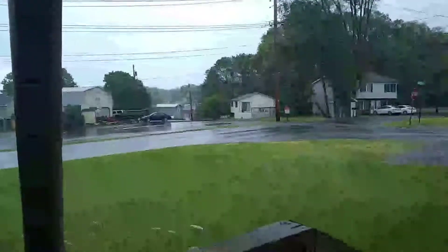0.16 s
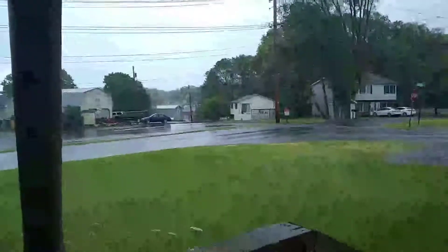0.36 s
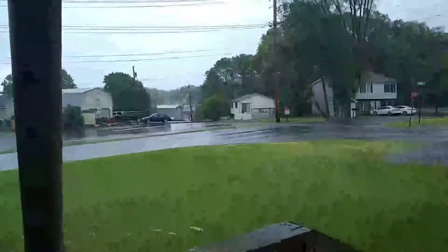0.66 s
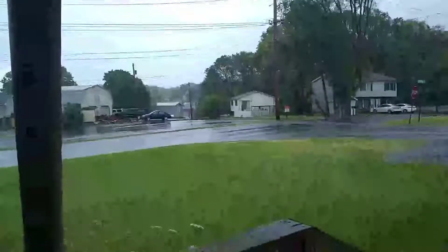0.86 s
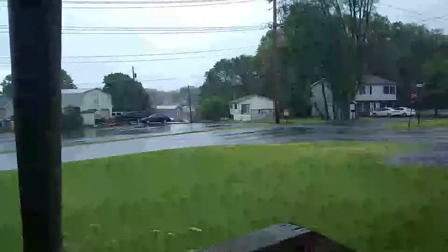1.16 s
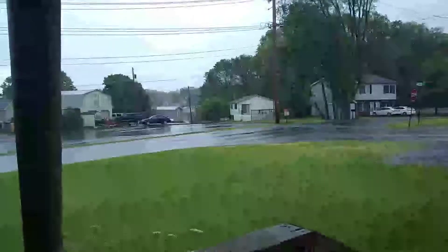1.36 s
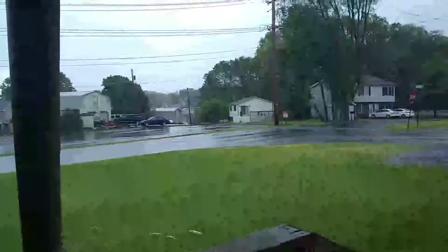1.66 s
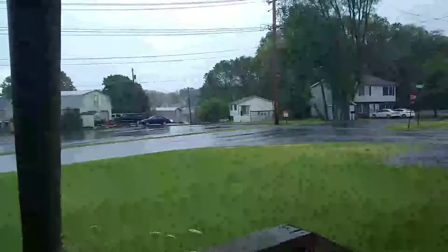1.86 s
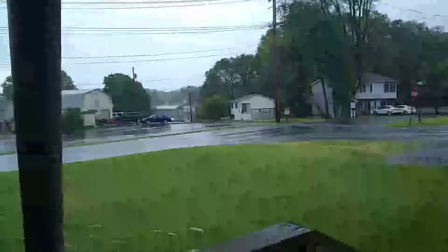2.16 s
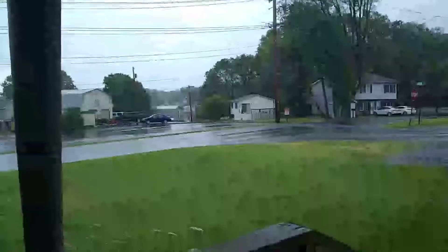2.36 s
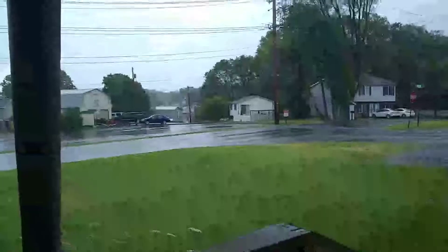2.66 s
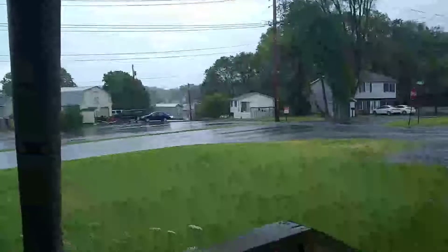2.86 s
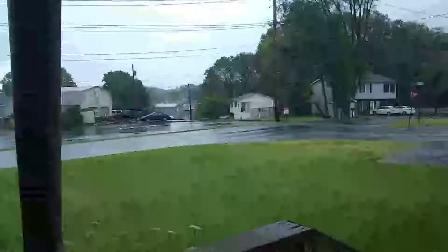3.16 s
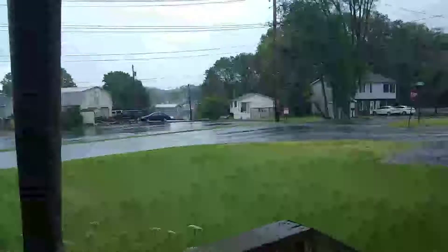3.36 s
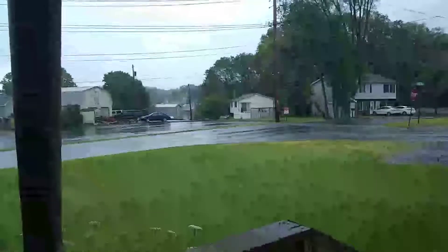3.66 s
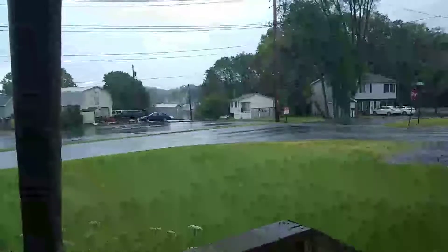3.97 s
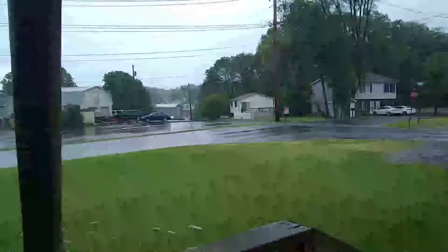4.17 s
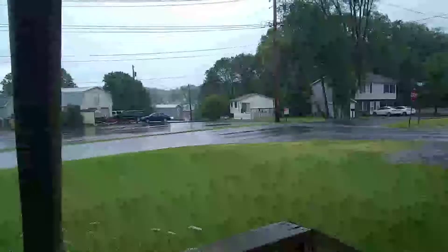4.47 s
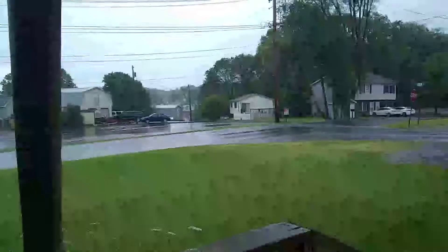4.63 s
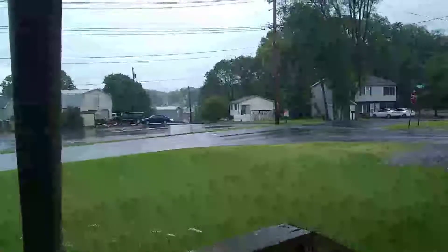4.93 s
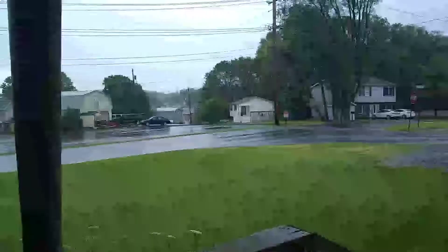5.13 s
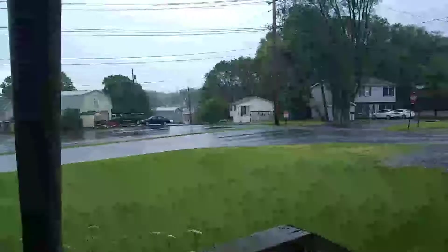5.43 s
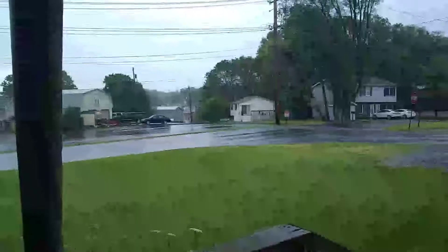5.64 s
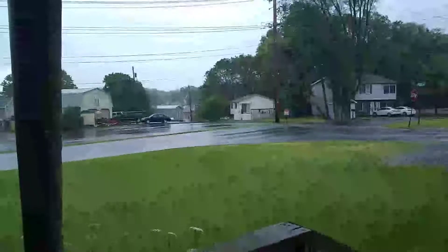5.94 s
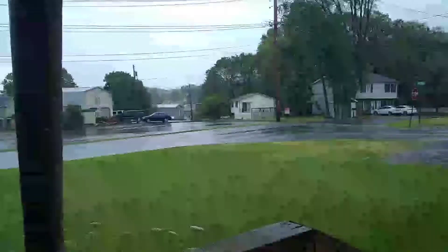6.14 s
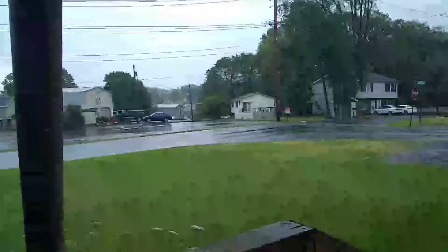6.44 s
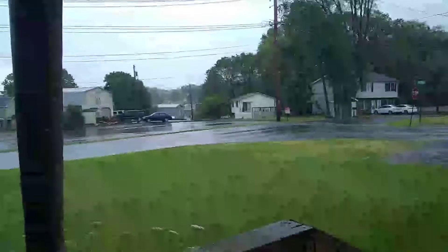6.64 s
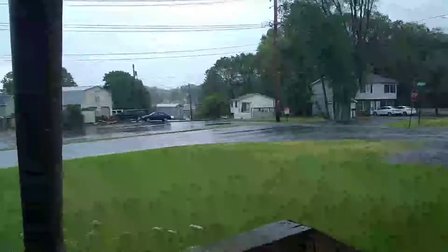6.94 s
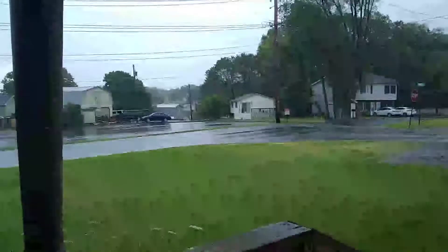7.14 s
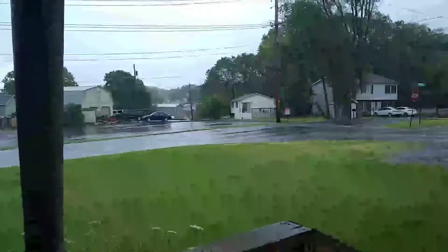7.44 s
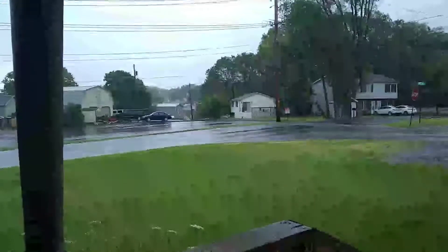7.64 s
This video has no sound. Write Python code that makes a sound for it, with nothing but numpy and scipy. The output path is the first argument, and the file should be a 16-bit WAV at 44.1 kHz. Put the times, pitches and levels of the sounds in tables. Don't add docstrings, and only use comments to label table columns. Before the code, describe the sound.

Dense downpour heard from a porch, a broad steady wash with faint low hum, nearby drop splashes, and short whistled bird calls scattered throughout.

```python
import sys
import numpy as np
from scipy import signal
from scipy.fft import rfft, irfft
from scipy.io import wavfile
from scipy.ndimage import uniform_filter1d

SR = 44100
rng = np.random.default_rng(int(sys.argv[2]) if len(sys.argv) > 2 else 0)


def int16_out(signal):
    q = np.round(np.clip(np.atleast_2d(signal).T, -1, 1) * 32767)
    wavfile.write(sys.argv[1], SR, q.astype(np.int16))


def invert_db(x):
    u = np.asarray(x, float) / 20
    return 10 ** u


N = 343980
HZ = np.maximum(np.fft.rfftfreq(N, 1 / SR), 1)


def rms_one(x):
    return x / np.sqrt(np.mean(x ** 2) + 1e-20)


def by_hz(rows):
    hz, *columns = np.transpose(rows)
    return [np.interp(np.log(HZ), np.log(hz), c) for c in columns]


def in_time(rows):
    s, *columns = np.transpose(rows)
    return [np.interp(np.arange(N) / SR, s, c) for c in columns]


def drift(rate_hz, count=1):
    r = np.exp(-2 * np.pi * rate_hz * 40 / SR)
    noise = rng.standard_normal((count, N // 40 + 2002))
    slow = signal.lfilter([1], [1, -2 * r, r * r], noise)[:, 2000:]
    return np.array([np.interp(np.arange(N) / 40, np.arange(len(s)), rms_one(s)) for s in slow])


def band(x, low_hz, high_hz):
    return signal.sosfilt(signal.butter(2, [low_hz, high_hz], "band", fs=SR, output="sos"), x)


# (frequency [Hz], share from the left [0-1], diffuse share [0-1], extra port phase [rad])
ARRIVAL = [(30, 0.6, 0.3, -1), (60, 0.16, 0.13, 0.099), (130, 0.16, 0.58, 1.1), (282, 0.19, 0.34, 1.57),
           (490, 0.1, 0.17, 0.81), (850, .4, .05, .2), (1135, .4, .007, 0), (2240, .45, .005, .09),
           (3430, .6, .09, -.06), (4550, .8, .21, 0), (5650, .8, .4, .09), (8200, 0.6, 0.63, -0.84),
           (10000, .5, 1, -0.46), (14000, 0.4, 1, 0.9)]
PORT_LAG_S = 4.4e-4


def ports(left_side, right_side=0, diffuse=(0, 0)):
    late = np.exp(-1j * (2 * np.pi * HZ * PORT_LAG_S + by_hz(ARRIVAL)[2]))
    left_port = left_side + late * right_side + diffuse[0]
    right_port = -late * left_side - right_side + diffuse[1]
    return np.array([left_port, right_port])


def spread(four):
    left, loose = (np.clip(c, 0, 1) for c in by_hz(ARRIVAL)[:2])
    a, b, c, d = four
    from_left = a * np.sqrt(left * (1 - loose))
    from_right = b * np.sqrt((1 - left) * (1 - loose))
    return ports(from_left, from_right, np.sqrt(loose) * np.array([c, d]))


# (frequency [Hz], density [dB per Hz])
RAIN = [(25, -19), (60, 0.5), (120, -1.5), (240, 0), (450, -1.5), (650, -6.5), (1400, -8.5), (3000, -9),
        (5000, -9), (6650, -11.5), (6900, -10), (8000, -15.5), (10000, -23.5), (14000, -28.5)]
# (time [s], level [dB])
STRENGTH = [(0, 1.1), (1.7, 0), (2.5, 0.8), (2.9, -0.7), (3.5, 0.6), (4.5, 0.1), (4.8, -0.5), (5.3, -0.1),
            (6.5, -1.7), (6.9, -1), (7.8, -1.5)]
HISS_DB, WASH_DB, WASH_FOLLOWS = -0.42, -1.0, 0.26
TRAFFIC_DB, TRAFFIC_RISE_DB_PER_S = -6.0, .5


def rain(drops_per_s=1100.0, size_db=2.5, gust_db=0.22, patch_db=0.86, drop_share=.07):
    strength_db, = in_time(STRENGTH)
    traffic_db = TRAFFIC_DB + TRAFFIC_RISE_DB_PER_S * np.arange(N) / SR
    levels_db = np.array([traffic_db, WASH_DB + WASH_FOLLOWS * strength_db, HISS_DB + strength_db])
    sizes_db = size_db * np.minimum(rng.exponential(1, N), 5)
    hit = (rng.random(N) < drops_per_s / SR) * invert_db(sizes_db)
    burst = rms_one(np.sqrt(signal.lfilter([1], [1, -.985], hit ** 2)))
    white = rng.standard_normal((2, 4, N))
    centres = np.array([80, 400, 1200, 2000, 3200, 4800, 7000, 9500, 12500])
    place = np.interp(np.log(HZ), np.log(centres), np.arange(len(centres)))
    gust, patches, out = drift(11.0)[0], drift(14.4, count=len(centres) + 1), 0
    for k, hz in enumerate(centres):
        shares = [np.interp(np.log(hz), np.log([80, 700, 10000]), row) for row in np.eye(3)]
        near = np.clip(np.log2(hz / 480.0) / 2, 0, 1)
        swell_db = near * (gust_db * gust + patch_db * (patches[k] + .5 * patches[k + 1]))
        grain = np.sqrt(1 + near * drop_share * (burst ** 2 - 1))
        window = np.cos(np.pi / 2 * np.clip(place - k, -1, 1))
        out = out + window * rfft(invert_db(shares @ levels_db + swell_db) * grain * white[k % 2])
    return spread(out) * invert_db(by_hz(RAIN)[0] - 33.0)


# (frequency [Hz], rms level [dB])
HUM = [(120, -69), (240, -64.5), (480, -69.5), (720.5, -76)]
# (time [s], level [dB])
LOAD = [(0, -69), (2.5, -76), (2.76, -59), (3.2, -67), (3.9, -70), (4.26, -53.5), (4.5, -71), (4.74, -58.5),
        (5.2, -60.5), (6.7, -60), (7.8, -71)]
THIRD_HZ = 179.8


def hum(waver_db=5.0, third_db=3.0):
    t, waver = np.arange(N) / SR, drift(4.7, count=len(HUM))
    tones = invert_db(in_time(LOAD)[0] + third_db) * np.sin(2 * np.pi * THIRD_HZ * t)
    for (hz, db), w in zip(HUM, waver):
        tones += invert_db(db + 2.0 + waver_db * w) * np.sin(2 * np.pi * (hz * t + rng.random()))
    return ports(0, rfft(tones))


# (time [s], rms level [dB], low edge [Hz], high edge [Hz], t60 [s])
SPLASHES = [(.31, -60, 4500, 9000, .1), (.67, -46, 3000, 6500, 0.072), (2.143, -38, 2580, 4330, 0.2),
            (2.17, -55, 2000, 4500, .14), (2.15, -53, 5000, 10000, 0.23), (2.145, -46, 900, 1800, 0.091),
            (2.6, -45.5, 1200, 3200, 0.1), (3.43, -57, 6000, 12000, .1), (3.491, -46, 2500, 8700, 0.063),
            (4.885, -43.5, 1000, 2900, .25), (5.335, -51, 1500, 4000, 0.17),
            (5.615, -46.5, 2000, 6300, 0.25), (6.066, -56, 7000, 12000, .08)]
NEARBY_ECHO_DB = -12.5


def splashes(spatter_db=1.0, rise_s=0.0025):
    out, t = np.zeros((4, N)), np.arange(SR // 4) / SR
    ragged = invert_db(spatter_db * drift(110.0)[0])
    for s, db, low_hz, high_hz, t60 in SPLASHES:
        at = slice(round(s * SR), round(s * SR) + len(t))
        puff = rms_one(band(rng.standard_normal((4, len(t))), low_hz, high_hz))
        out[:, at] += invert_db(db - 60 * t / t60) * np.minimum(t / rise_s, 1) * ragged[at] * puff
    spectra = rfft(out)
    return spread(spectra) + invert_db(NEARBY_ECHO_DB) * spectra[2:]


WHISTLE_RASP_HZ, WARBLE_RASP_HZ, CHIP_RASP_HZ = 35.0, 100, 55

# (time [s],
# length [s], first pitch [Hz], last pitch [Hz], rms level [dB])
CHIPS = [(0.329, 0.075, 3390, 3010, -55), (0.523, .035, 3300, 3130, -59), (4.12, 0.0214, 5520, 4820, -50),
         (1.859, 0.02, 3760, 4270, -57), (2.207, 0.058, 2870, 2820, -51), (2.2, 0.04, 3650, 3530, -59),
         (2.884, 0.033, 4050, 3990, -58), (4.185, 0.023, 3720, 3670, -50.5), (4.33, 0.028, 3370, 4700, -50),
         (4.358, .019, 3950, 3600, -45), (4.375, .02, 3520, 3500, -49), (4.388, .032, 3820, 3800, -52),
         (4.4, 0.013, 3470, 3160, -50), (6.873, 0.049, 3300, 3110, -60)]


def chips():
    return [(s, length, [first, last], db, CHIP_RASP_HZ) for s, length, first, last, db in CHIPS]


# (time [s], length [s], pitch [Hz], rms level [dB], rms level of the rise into it [dB])
WHISTLES = [
    (1.691, 0.042, 6520, -54, -66),
    (3.986, .032, 6680, -49, -66),
    (5.074, 0.031, 6720, -49, -48),
    (7.281, 0.053, 6730, -49, -48),
]
LEAD_S, LEAD_HZ = 0.021, -850
DROP_S, DROP_HZ, DROP_DB = 0.023, -520, 2
RING_S, RING_DB = .045, -7.0
UPPER_HZ, UPPER_DB, UPPER_S = 877, -11.5, 0.065


def whistles():
    out = []
    for s, length, hz, db, lead_db in WHISTLES:
        end = s + length
        out += [(s - LEAD_S, LEAD_S, [hz + LEAD_HZ, hz], lead_db, WHISTLE_RASP_HZ),
                (s, length, [hz, hz], db, WHISTLE_RASP_HZ),
                (end, DROP_S, [hz, hz + DROP_HZ, hz + DROP_HZ], db + DROP_DB, WARBLE_RASP_HZ),
                (end, RING_S, [hz, hz], db + RING_DB, WHISTLE_RASP_HZ),
                (s, UPPER_S, [hz + UPPER_HZ, hz + UPPER_HZ], db + UPPER_DB, WHISTLE_RASP_HZ)]
    return out


# (time [s], length [s], pitch [Hz], rms level [dB], rasp width [Hz])
LOWER = [(1.725, .06, 5400, -54.5, 160), (1.92, .035, 5370, -53.5, 200), (1.955, 0.034, 5040, -48.5, 200),
         (4.016, .1, 5470, -48.5, 73), (4.14, .05, 5120, -50.5, 140), (4.135, .07, 5800, -52, 250),
         (1.875, 0.043, 6200, -59, 130), (4.191, 0.19, 5600, -58, 400), (5.119, 0.049, 5180, -53.5, 200),
         (5.285, 0.042, 5760, -51, 300), (5.292, 0.053, 5150, -51, 250), (6.777, .053, 4920, -56, 300),
         (7.339, 0.13, 5420, -53.5, 130), (7.43, .015, 4730, -53, 30), (7.448, 0.068, 5500, -56.5, 140),
         (7.483, 0.16, 5890, -57.5, 600)]
SAG_HZ_PER_S = 1100


def lower_voice():
    return [(s, length, [hz, hz - SAG_HZ_PER_S * length], db, rasp_hz) for s, length, hz, db, rasp_hz in LOWER]


# (time [s], length [s], rms level [dB])
ARCHES = [
    (1.915, .04, -57),
    (4.042, .047, -50),
    (4.093, 0.047, -47.5),
    (5.252, .047, -47),
    (5.313, 0.036, -51),
    (7.359, 0.046, -45),
    (7.411, 0.057, -50),
    (7.575, 0.043, -60),
]
ARCH_HZ = [5600, 6300, 6590, 6500, 6050]


def arches():
    return [(s, length, ARCH_HZ, db, WARBLE_RASP_HZ) for s, length, db in ARCHES]


def birds(hoarse_per_hz=0.0042, rough_db=2.5, edge_s=0.0051, echo_t60=0.51, echo_db=-7):
    out, flutter, breath = np.zeros(N), drift(69.0)[0], rng.standard_normal((2, N))
    for start, length, path_hz, db, rasp_hz in chips() + whistles() + lower_voice() + arches():
        at = np.arange(round(start * SR), round((start + length) * SR))
        t = at / SR - start
        pitch_hz = np.interp(t, np.linspace(0, length, len(path_hz)), path_hz)
        turn = np.exp(2j * np.pi * np.cumsum(pitch_hz) / SR)
        low_pass = signal.butter(2, max(rasp_hz, 5) * 2, fs=SR)
        rasp = signal.lfilter(*low_pass, breath[:, at - round(path_hz[0])])
        hoarse = np.clip(hoarse_per_hz * rasp_hz, 0, 1)
        voice = np.sqrt(1 - hoarse) + np.sqrt(2 * hoarse) * np.array([1, 1j]) @ rms_one(rasp) / 2
        shape = np.clip(np.minimum(t, t[-1] - t) / edge_s, 0, 1)
        out[at] += invert_db(db + 5.5 + rough_db * flutter[at]) * shape * (voice * turn).imag
    t = np.arange(SR // 2) / SR
    tails = rng.standard_normal((2, len(t))) * invert_db(-60 * t / echo_t60) * (t > .006)
    echoes = invert_db(echo_db) * rfft(tails / np.sqrt(np.sum(tails[0] ** 2)), N)
    return ports(rfft(out)) + echoes * rfft(out)


# (frequency [Hz], left minus right [dB])
LEAN = [(60, -4.5), (110, 0), (200, 2.5), (370, 1.5), (690, 0), (1270, 1), (2330, -1), (4290, 0),
        (7900, -0.5), (14500, -8)]


def scene():
    lean_db = by_hz(LEAN)[0] / 2
    return irfft((rain() + hum() + splashes() + birds()) * invert_db([lean_db, -lean_db]), N)


# (frequency [Hz], limit [dB])
COARSE = [(500, -22), (2000, -13), (5000, -13), (8000, -5), (10000, -1), (13000, 2.5)]
# (frequency [Hz], limit [dB])
STARVED = [(800, -25), (2200, -11.5), (4500, -11)]
JOINT_BELOW_HZ = 7000


def coarse(x):
    hz, _, lines = signal.stft(x, SR, nperseg=2048)
    joint = hz < JOINT_BELOW_HZ
    turn = np.array([[1, 0.87], [1, -1.054]]) / np.sqrt(2)
    lines[:, joint] = np.tensordot(turn, lines[:, joint], 1)
    power = np.abs(lines) ** 2
    around = np.where(joint[:, None], power.mean(axis=0), power)
    around = uniform_filter1d(uniform_filter1d(around, size=40, axis=1), size=2, axis=2)
    limit_hz, limit_db = np.transpose(COARSE)
    limit = invert_db(np.interp(np.log(hz + 1), np.log(limit_hz), limit_db))[:, None] ** 2
    starved = invert_db(np.interp(hz, *np.transpose(STARVED)))[:-1, None] ** 2
    whole = power[:, :-1].reshape(2, -1, 8, power.shape[2]).mean(axis=2)
    whole = np.repeat(whole, 8, axis=1)
    lines[:, :-1] *= whole ** 4 / (whole ** 4 + (starved * around[:, :-1]) ** 4 + 1e-80)
    lines *= np.sqrt(1 + limit) * power ** 2 / (power ** 2 + (limit * around) ** 2 + 1e-40)
    lines[:, joint] = np.tensordot(turn, lines[:, joint], 1)
    return signal.istft(lines, SR, nperseg=2048)[1][:, :N]


def band_limit(x):
    return signal.sosfilt(signal.butter(12, 15130, fs=SR, output="sos"), x)


TOP_HZ = 14240


def record(dry):
    mix = irfft(rfft(coarse(dry)) * (HZ < TOP_HZ), N)
    return band_limit(mix)


dry = scene()
out = record(dry)
int16_out(out)
```